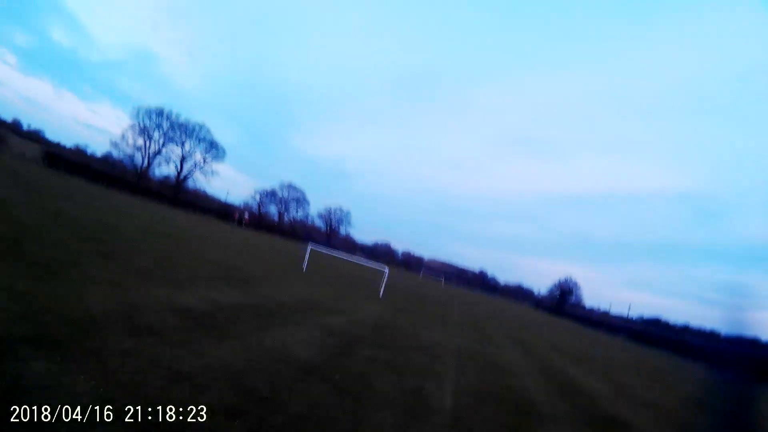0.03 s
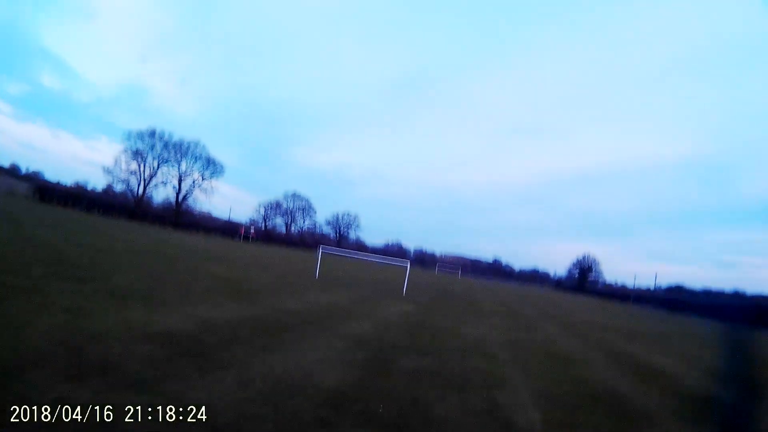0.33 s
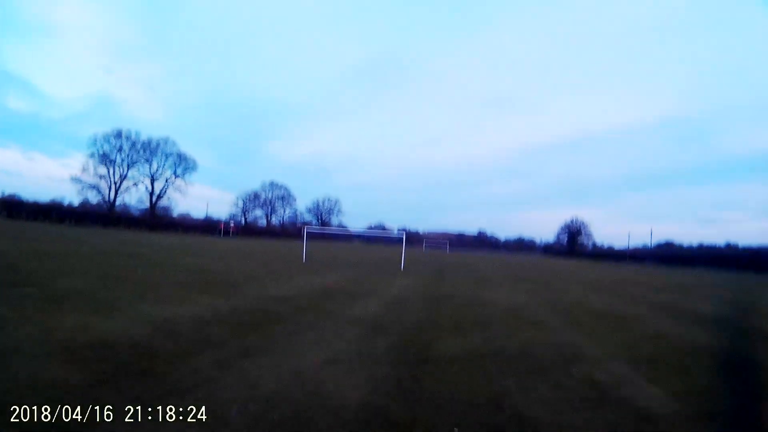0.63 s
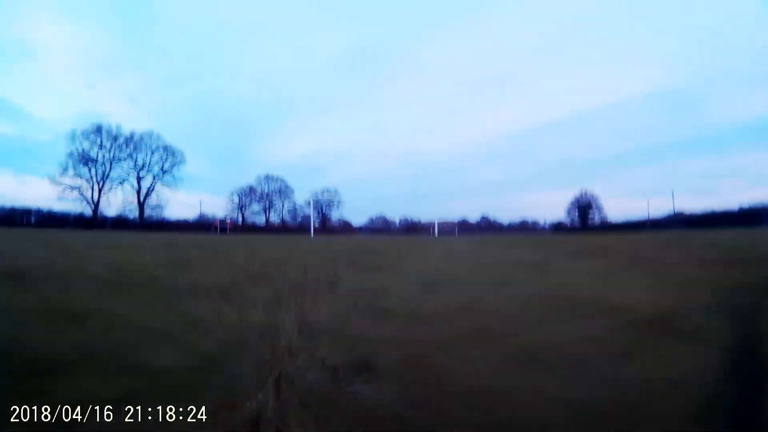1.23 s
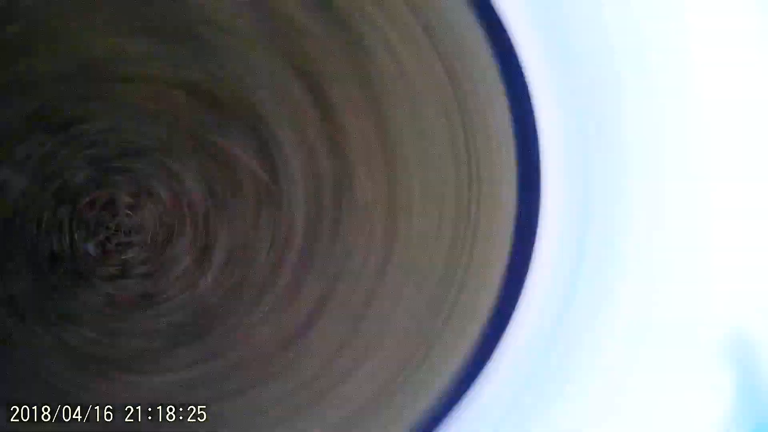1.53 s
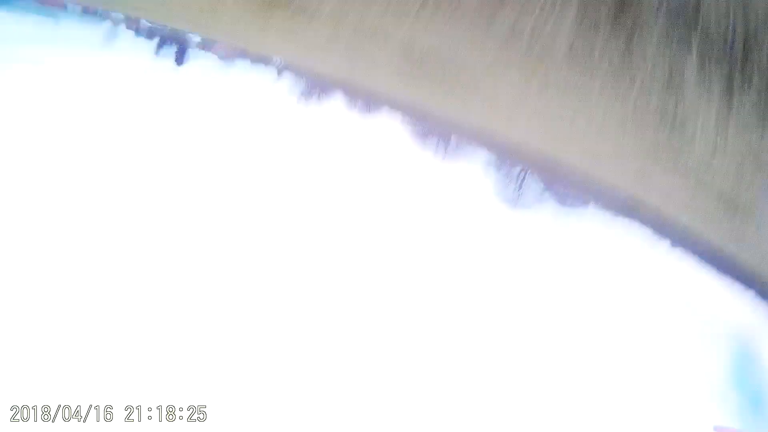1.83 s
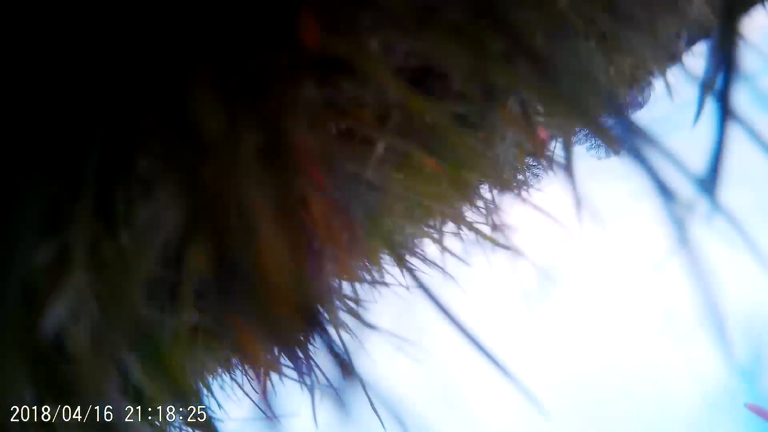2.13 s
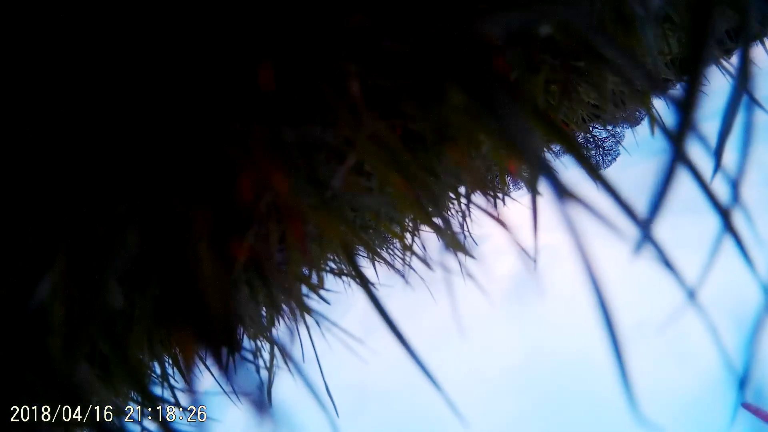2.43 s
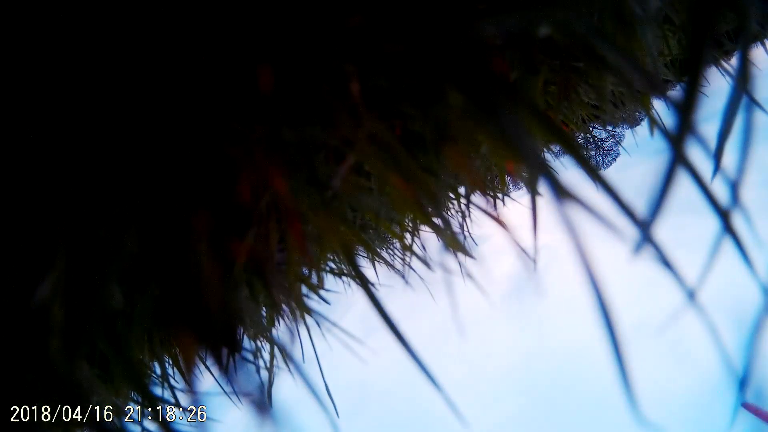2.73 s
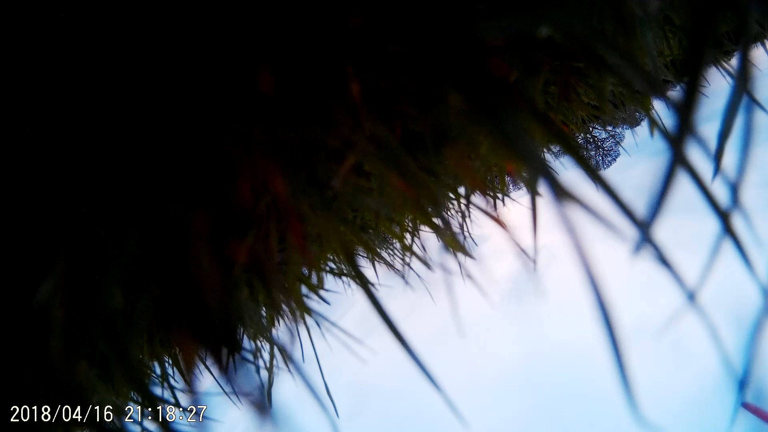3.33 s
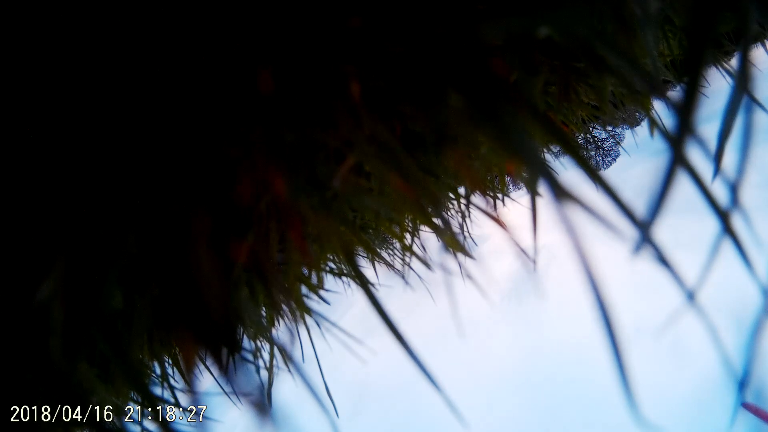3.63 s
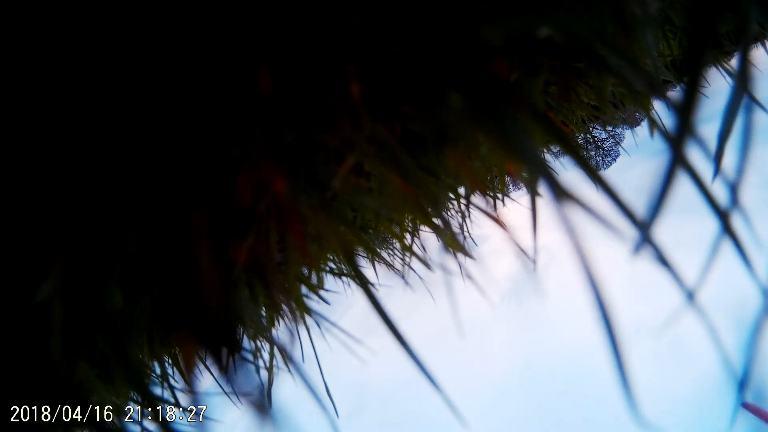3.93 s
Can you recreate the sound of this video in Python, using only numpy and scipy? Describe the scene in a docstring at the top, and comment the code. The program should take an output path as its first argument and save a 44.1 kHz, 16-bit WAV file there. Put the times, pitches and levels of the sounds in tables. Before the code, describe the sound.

A small drone buzzes steadily with rushing air, right at its on-board microphone, on the left only. At 1.3 seconds it strikes the ground with a loud crack, and one rotor races, then winds down. Further crunching knocks come at about 1.8 and 2.1 seconds. It slides briefly through snapping grass and creaks faintly until about 2.8 seconds, leaving near silence with a few tiny ticks.

```python
"""Four rotors drone over their rushing wash, close up, at the camera microphone of a small quadcopter
skimming a field. A bright buzz pulses at rotor rate. The craft clips the ground and tumbles while
one rotor races and runs down; it bounces, lands and slides, crushing grass and ringing its frame.
Stalks snap and the frame creaks as it settles. The overloaded microphone feeds the left channel only."""
import sys
import numpy as np
from scipy.fft import rfft, irfft, next_fast_len
from scipy.io import wavfile
from scipy.ndimage import map_coordinates

SR = 44100
rng = np.random.default_rng(int(sys.argv[2]) if len(sys.argv) > 2 else 0)


def log_audio(samples):
    """Write samples as a 16-bit WAV file to the path given in sys.argv[1]."""
    # one column per channel
    frames = np.atleast_2d(samples).T
    # limit to full scale, then quantise
    limited = np.clip(frames, -1, 1)
    pcm = np.round(limited * 32767).astype(np.int16)
    wavfile.write(sys.argv[1], SR, pcm)


N = 176400

# The unbalanced rotor, loudest at the microphone. Each row: time in seconds, shaft speed in Hz, level in dB.
LEAD_ROTOR = [(0.01, 195.4, -12.5), (0.224, 196.1, -13.5), (0.304, 195.1, -13.5), (0.358, 195.2, -14.5),
              (0.788, 192.3, -14.5), (0.828, 194.5, -15), (0.904, 192.9, -14), (1.252, 193.9, -14),
              (1.3, 190.5, -15.5)]
# Its harmonics. Each row: multiple of the shaft speed, relative level in dB.
LEAD_HARMONICS = [(1, 2), (2, -12.5), (3, -17), (4, -23), (5, -22), (6, -19), (7, -22), (8, -17.5),
                  (9, -23), (10, -24.5), (11, -39.5), (12, -35.5), (13, -30)]
# The three steering rotors. Each row: time in seconds, then each one's shaft speed in Hz.
STEERING_SPEEDS = [(0, 213, 209, 159.7), (.12, 202, 232.2, 157.6), (.3, 208, 233.2, 160.6),
                   (.46, 205, 237, 174.6), (.56, 221, 251.4, 178.7), (.67, 229, 259, 180),
                   (.83, 230, 263, 172.5), (1.0, 225, 261, 173.6), (1.18, 225, 251.6, 176.8),
                   (1.31, 218, 249.9, 180)]
# Their harmonics. Each row: multiple of the shaft speed, then each one's level in dB.
STEERING_HARMONICS = [(1, -39, -27.5, -50), (2, -29, -42.5, -41), (4, -45.5, -43, -39.5),
                      (6, -43, -40, -50), (8, -47.5, -48.5, -42)]
STRIKE_S, STALL_S = 1.303, .016

def rotor_drone(jitter_rad=.025):
    """Four rotors around the microphone sound harmonics of their shaft speeds, then stall at the strike."""
    hz, db = curves(LEAD_ROTOR)
    turn = angle(hz) + jitter_rad * wobble(70)
    out = amp(db) * sum(amp(level) * tone(k * turn, waver_db=2 if k > 1 else .4)
                        for k, level in LEAD_HARMONICS)
    for i, speed in enumerate(curves(STEERING_SPEEDS)):
        turn = angle(speed + 1.3 * wobble(24))
        out += sum(amp(levels[i]) * tone(k * turn, waver_db=1) for k, *levels in STEERING_HARMONICS)
    return out * np.clip((STRIKE_S - clock()) / STALL_S + 1, 0, 1)


# The rotor that races in the tumble. Each row: time in seconds, shaft speed in Hz.
RACING_SPEED = [(1.325, 150), (1.345, 186.1), (1.369, 222.4), (1.399, 253.7), (1.427, 267.5), (1.465, 242),
                (1.499, 219.3), (1.551, 173.4), (1.6, 145.9), (1.659, 122.6), (1.701, 104.4), (1.76, 89.6),
                (1.88, 60)]
# Its first three blade tones. Each row: time in seconds, then each tone's level in dB.
BLADE_LEVELS = [(1.325, -37.5, -43.5, -51.5), (1.36, -16.5, -39, -31), (1.40, -16, -18, -28),
                (1.427, -17, -49.5, -22), (1.465, -15.5, -20.5, -23), (1.5, -20, -35.5, -16),
                (1.55, -19.5, -21, -35), (1.62, -24.5, -21, -36.5), (1.68, -32, -28.5, -32),
                (1.74, -29, -28, -27.5), (1.77, -29.5, -34.5, -32), (1.8, -46.5, -51, -54.5),
                (1.9, -69, -78.5, -75)]
# Its other harmonics, heard as a rattle. Each row: time in seconds, level in dB.
RATTLE_LEVEL = [(1.325, -39), (1.39, -28.5), (1.49, -30.5), (1.56, -35.5), (1.68, -35.5), (1.755, -37),
                (1.79, -47), (1.9, -78.5)]
# Their path through the frame to the microphone. Each row: frequency in Hz, gain in dB.
FRAME_RESPONSE = [(150, 0.5), (260, 1), (600, -4), (1000, -2), (1500, 3.5), (1900, -8.5), (2300, -11.5),
                  (2900, -22.5), (3900, -22), (5500, -35.5)]
# Drive switching beats with the rotor. Each row: shaft multiple below the carrier, top-speed level in dB.
DRIVE_SIDEBANDS = [(2, -49.5), (4, -54), (6, -51.5)]
CARRIER_HZ, POWER_OFF_S = 16000, 1.77  # the second blow cuts the drive

def racing_rotor(jitter_rad=.025, odd_db=-5.5, whine_order=36, whine_db=-48.5):
    """A two-bladed rotor races and runs down; its motor whines magnetically while it speeds up."""
    t = clock()
    hz, = curves(RACING_SPEED)
    turn = angle(hz) + jitter_rad * wobble(130)
    blades = sum(amp(db) * tone(2 * k * turn, .99) for k, db in enumerate(curves(BLADE_LEVELS), 1))
    rattle_db, = curves(RATTLE_LEVEL)
    rattle = sum(amp(rattle_db + along(FRAME_RESPONSE, k * hz) + odd_db * (k % 2)) * tone(k * turn, 1.5)
                 for k in range(1, 22) if k not in (2, 4, 6))
    whine = amp(whine_db) * tone(whine_order * turn, 2) * (np.gradient(hz) > 0)
    carrier = 2 * np.pi * CARRIER_HZ * t
    sidebands = sum(amp(db) * tone(carrier - k * turn, 1.5) for k, db in DRIVE_SIDEBANDS)
    squeal = hz / hz.max() * (t < POWER_OFF_S) * sidebands
    running = (t > RACING_SPEED[0][0]) & (t < RACING_SPEED[-1][0])
    return running * (blades + rattle + whine + squeal)


# Prop wash and wind right on the microphone. Each row: time in seconds, level in dB.
WASH_LEVEL = [(0, -19.5), (.12, -19.5), (.25, -22), (.8, -21.5), (.87, -22.5), (.915, -20), (.945, -23),
              (.975, -20), (1.02, -22.5), (1.31, -20.5), (1.33, -25), (1.38, -23.5), (1.49, -24),
              (1.57, -26.5), (1.75, -31), (1.83, -33.5), (1.88, -51), (1.94, -56.5), (2.02, -60.5),
              (2.2, -80), (2.4, -110)]
# Their colour in flight and in the tumble. Each row: frequency in Hz, relative density in dB.
FLIGHT_WASH_SPECTRUM = [(25, -11), (60, -6), (120, -6), (200, 4), (330, 0.5), (600, -0.5), (900, -4.5),
                        (1200, 0.5), (1500, -1.5), (2000, -9), (2800, -17.5), (3700, -12), (4500, -16.5),
                        (5300, -27.5), (6400, -25), (7600, -25), (8200, -31.5), (10500, -34), (12200, -32),
                        (13400, -33.5), (14600, -25.5), (15700, -33)]
TUMBLE_WASH_SPECTRUM = [(25, -8), (70, -5.5), (130, -10.5), (250, 1.5), (450, -4), (800, -1), (1200, 1.5),
                        (1550, 4), (2100, -5), (2900, -16.5), (3800, -9), (4500, -10), (5500, -18.5),
                        (7000, -26.5), (9000, -29.5), (10500, -31), (12000, -24.5), (13300, -28.5),
                        (14600, -21), (15700, -21.5)]

def prop_wash(chop_depth=.2, flutter_db=.9):
    """Turbulent air, chopped once a rotor turn in flight and twice a turn in the tumble."""
    flying = clock() < STRIKE_S + STALL_S
    chop_hz = np.where(flying, curves(LEAD_ROTOR)[0], 2 * curves(RACING_SPEED)[0])
    chop = 1 + chop_depth * np.sin(angle(chop_hz))
    air = np.where(flying, noise(FLIGHT_WASH_SPECTRUM), noise(TUMBLE_WASH_SPECTRUM))
    db, = curves(WASH_LEVEL)
    return amp(db + flutter_db * wobble(60)) * unit(air * chop)


# Blows into the turf, right by the microphone. Each row: peak time in seconds, level in dB,
# rise and fall in seconds per 20 dB, brightness in dB per octave.
GROUND_BLOWS = [(1.308, -17, 0.0073, .01, 1), (1.3161, -1, 0.0043, 0.0052, 0),
                (1.319, -9, .008, 0.011, -3.5), (1.335, -13, 0.0013, 0.0023, 1.5),
                (1.769, -13, 0.0094, 0.016, 2.5), (1.795, -15, 0.029, 0.034, 2),
                (1.829, -24.5, .012, 0.017, -2), (2.037, -44, 0.0098, .03, -5.5),
                (2.072, -28.5, .002, 0.024, 0.5), (2.081, -25.5, .005, 0.12, 1.5),
                (2.11, -10.5, 0.02, 0.023, -0.5), (2.141, -22.5, 0.0089, 0.035, -0.5)]
# Crushed grass and soil. Each row: frequency in Hz, relative density in dB.
CRUNCH_SPECTRUM = [(59, -26.5), (100, -4.5), (189, -1), (699, -5), (828, -1.5), (1240, -1.5), (1530, 0),
                   (2100, -4), (3070, -9.5), (3960, -5.5), (5790, -16.5), (6860, -19), (7960, -28.5),
                   (11900, -24), (15600, -32.5)]

def ground_crunches():
    """Each ground contact crushes a dense shower of stalks and soil."""
    out, t = np.zeros(N), clock()
    for s, db, rise, fall, bright in GROUND_BLOWS:
        fade = np.maximum((s - t) / rise, (t - s) / fall)
        out += grass_noise(CRUNCH_SPECTRUM, bright) * amp(db - 20 * fade)
    return out


# Knocks on the frame that holds the camera. Each row: start in seconds, ring and thud levels in dB.
KNOCKS = [(1.307, -9, -20), (1.3139, 3, -15.5), (1.7678, 1.5, -21), (1.777, -8, -19.5),
          (1.797, -25.5, -19.5), (1.842, -31, -26), (1.862, -28, -30.5), (1.906, -54, -38.5),
          (2.025, -38.5, -37), (2.034, -53.5, -35), (2.103, -12, -22.5), (2.1186, -15, -30)]
# The frame's modes. Each row: frequency in Hz, relative level in dB, seconds to fall 60 dB.
FRAME_MODES = [(776, -11.5, 0.017), (1040, -11.5, .015), (1542, 3, 0.021), (1680, -13, 0.017),
               (3980, -13.5, .015), (4400, -15, 0.006), (14100, -24, .02)]
# The turf's thud. Each row: frequency in Hz, relative density in dB.
THUD_SPECTRUM = [(25, -3), (90, -3), (180, 4.5), (350, -3), (700, -8.5), (1500, -28.5), (5000, -67)]

def frame_knocks(thud_t60=.1, attack_s=.0008):
    """Hard contacts ring the frame and thud in the turf."""
    out, t = np.zeros(N), np.arange(SR // 4) / SR
    attack = 1 - np.exp(-t / attack_s)
    for s, ring_db, thud_db in KNOCKS:
        thud = noise(THUD_SPECTRUM)[:len(t)] * amp(thud_db - 60 * t / thud_t60)
        add(out, s, (amp(ring_db) * ring(FRAME_MODES, t) + thud) * attack)
    return out


# Stalks breaking close by. Each row: start in seconds, level in dB, pitch in Hz.
STALK_SNAPS = [(1.797, -5, 4340), (1.7999, -14, 3870), (1.8278, -21.5, 3580), (1.862, -31.5, 4240),
               (1.886, -41, 4140), (1.905, -45, 4170), (1.921, -48, 4280), (2.039, -36.5, 4300),
               (2.0972, -8, 3850), (2.173, -22.5, 3630), (2.1956, -25, 3400), (2.224, -29, 2220),
               (2.295, -31, 1910), (2.3157, -20.5, 4470), (2.334, -33.5, 4070), (2.357, -42.5, 3970),
               (2.383, -43, 2050), (2.396, -44, 1680), (2.41, -42.5, 3770), (2.4814, -42, 1614),
               (2.516, -53, 1800), (3.3506, -56, 1500), (3.3955, -47, 1630), (3.434, -56.5, 1500),
               (3.5073, -56, 1600), (3.694, -61, 4030), (3.8377, -62, 4000)]

def stalk_snaps(ring_cycles=20, crack_db=-16, crack_t60=.005):
    """A stalk cracks and flicks the frame, which rings briefly."""
    out, t = np.zeros(N), np.arange(SR // 20) / SR
    for s, db, hz in STALK_SNAPS:
        crack = rng.standard_normal(len(t)) * amp(crack_db - 60 * t / crack_t60)
        add(out, s, amp(db) * (ring([(hz, 0, ring_cycles / hz)], t) + crack))
    return out


# A bright rotor-rate buzz, close up, with brief flares of brushed grass or turbulent air.
# Each row: time in seconds, level in dB.
BUZZ_LEVEL = [(0, -38), (.036, -30.5), (.065, -38), (.1, -27.5), (.13, -39), (.3, -33), (.5, -41.5),
              (.89, -44.5), (.915, -29), (.94, -42.5), (.975, -32.5), (1.0, -45.5), (1.29, -45),
              (1.32, -44.5), (1.34, -100)]
# Its colour. Each row: frequency in Hz, relative density in dB.
BUZZ_SPECTRUM = [(500, -11), (1500, 1.5), (2800, -2.5), (4000, -4.5), (6000, -8), (10000, -18),
                 (15500, -18.5)]

def rotor_buzz(sharpness=2.5):
    """Bright noise pulses once at each turn of the unbalanced rotor."""
    turn = angle(curves(LEAD_ROTOR)[0])
    bursts = np.exp(sharpness * np.sin(turn))
    return amp(curves(BUZZ_LEVEL)[0]) * unit(bursts * noise(BUZZ_SPECTRUM))


# Grass brushing past at ground level. Each row: start and end in seconds, level in dB,
# brightness in dB per octave.
SLIDES = [(2.2, 2.255, -38.5, 0), (2.25, 2.32, -43, -.3), (2.34, 2.418, -56, -3), (2.43, 2.5, -66, -3),
          (3.36, 3.49, -72, 6.5)]
# Its colour. Each row: frequency in Hz, relative density in dB.
SLIDE_SPECTRUM = [(100, -19.5), (400, -10), (900, -2.5), (1600, 3), (2300, -2.5), (2900, -5.5), (4000, -2),
                  (5200, -13), (8000, -25), (10500, -27.5), (13000, -19.5), (15500, -29.5)]

def grass_slides(rise_s=.012, fall_s=.033, catch_db=1):
    """The frame scrapes through the grass, catching unevenly; rise and fall each span 20 dB."""
    out, t = np.zeros(N), clock()
    for start, end, db, bright in SLIDES:
        fade = np.maximum(0, np.maximum((start - t) / rise_s, (t - end) / fall_s))
        out += grass_noise(SLIDE_SPECTRUM, bright) * amp(db - 20 * fade + catch_db * wobble(150))
    return out


# The frame settling in the grass, close and faint. Each row: start in seconds, level in dB.
SLIPS = [(2.5355, -45), (2.622, -44), (2.6591, -48), (2.7165, -47), (2.720, -44), (2.7311, -45),
         (2.741, -49.5), (2.7516, -47), (2.7637, -45), (2.779, -47.5), (2.798, -49.5), (2.816, -46),
         (2.8403, -47.5)]
# The modes a slip rings. Each row: frequency in Hz, relative level in dB, seconds to fall 60 dB.
SLIP_MODES = [(960, -2, 0.007), (1260, -4.5, 0.0077), (2480, -16.5, 0.0054)]

def frame_creak():
    """The frame creaks to rest in a row of small slips."""
    out, t = np.zeros(N), np.arange(SR // 20) / SR
    for s, db in SLIPS:
        add(out, s, amp(db) * ring(SLIP_MODES, t))
    return out


# A thin whistle behind the drone. Each row: time in seconds, level in dB.
WHISTLE_LEVEL = [(0, -49.5), (.45, -48.5), (.55, -50), (1.3, -50), (1.33, -64.5), (1.41, -65), (1.43, -49),
                 (1.565, -51.5), (1.58, -100)]

def motor_whistle(centre_hz=7480, width_hz=120):
    """A motor whistles in one narrow band of noise."""
    band = filtered(rng.standard_normal(N), lambda hz: 1 / (1 + ((hz - centre_hz) / width_hz) ** 2))
    return amp(curves(WHISTLE_LEVEL)[0]) * unit(band)


# The quiet field behind it all. Each row: frequency in Hz, relative density in dB.
AIR_SPECTRUM = [(15, -35.5), (25, -6), (110, -5.5), (184, -9), (228, -10), (332, -11), (380, -12),
                (423, -13), (1240, -25), (4070, -32.5), (15600, -35)]

def still_air(db=-64):
    """A steady bed of still air and hiss."""
    return amp(db) * noise(AIR_SPECTRUM)


def grass_noise(spectrum, db_per_octave, stalks_per_s=3000, stalk_share=.59):
    """Stalks break at random over a fine hiss, coloured and tilted, at rms 1."""
    stalks = unit(rng.standard_normal(N) * (rng.random(N) < stalks_per_s / SR))
    grit = np.sqrt(stalk_share) * stalks + np.sqrt(1 - stalk_share) * rng.standard_normal(N)
    return unit(filtered(grit, lambda hz: amp(along(spectrum, hz) + db_per_octave * np.log2(hz / 2000 + .12))))


def amp(db):
    """Decibels to gain."""
    return 10 ** (np.asarray(db) / 20)


def unit(x):
    """x at rms 1."""
    return x / np.sqrt(np.mean(x ** 2) + 1e-20)


def along(points, hz):
    """Read (Hz, value) points on a log frequency axis."""
    f, v = np.transpose(points)
    return np.interp(np.log(hz + 1), np.log(f + 1), v)


def clock():
    """Time of each sample in seconds."""
    return np.arange(N) / SR


def curves(rows):
    """One value per sample for each column after the time."""
    s, *cols = np.transpose(rows)
    return [np.interp(clock(), s, c) for c in cols]


def wobble(rate):
    """A smooth random curve, rate knots a second."""
    return map_coordinates(rng.standard_normal(1000), [clock() * rate], mode="wrap")


def filtered(x, response):
    """x through a gain that depends on frequency."""
    m = next_fast_len(N + 8192)
    return irfft(rfft(x, m) * response(np.fft.rfftfreq(m, 1 / SR)), m)[:N]


def noise(spectrum):
    """Coloured noise of rms 1."""
    return unit(filtered(rng.standard_normal(N), lambda hz: amp(along(spectrum, hz))))


def angle(hz):
    """Angle in radians from turns a second."""
    return 2 * np.pi * np.cumsum(hz) / SR


def tone(phase, waver_db):
    """A sine of rms about 1 whose level wavers."""
    return np.sqrt(2) * np.sin(phase + rng.uniform(0, 2 * np.pi)) * amp(waver_db * wobble(14))


def ring(modes, t):
    """Damped modes, their levels a little different at each blow."""
    return sum(amp(db + rng.normal(0, 1) - 60 * t / t60) * np.sin(2 * np.pi * hz * t)
               for hz, db, t60 in modes)


def add(track, s, sound):
    """Lay a sound into the track at s seconds."""
    part = track[round(s * SR):][:len(sound)]
    part += sound[:len(part)]


def scene():
    """Everything reaches the one on-board microphone, on the left channel."""
    craft = rotor_drone() + racing_rotor() + prop_wash() + motor_whistle() + rotor_buzz()
    crash = ground_crunches() + grass_slides() + frame_knocks() + stalk_snaps() + frame_creak()
    return np.array([craft + crash + still_air(), np.zeros(N)])


def record(dry, gain_db=5.5, top_hz=15800):
    """The camera's microphone overloads, then the top of the band is cut off."""
    clipped = np.clip(amp(gain_db) * dry, -1, 1)
    return np.array([filtered(channel, lambda hz: hz < top_hz) for channel in clipped])


dry = scene()
out = record(dry)
log_audio(out)
```